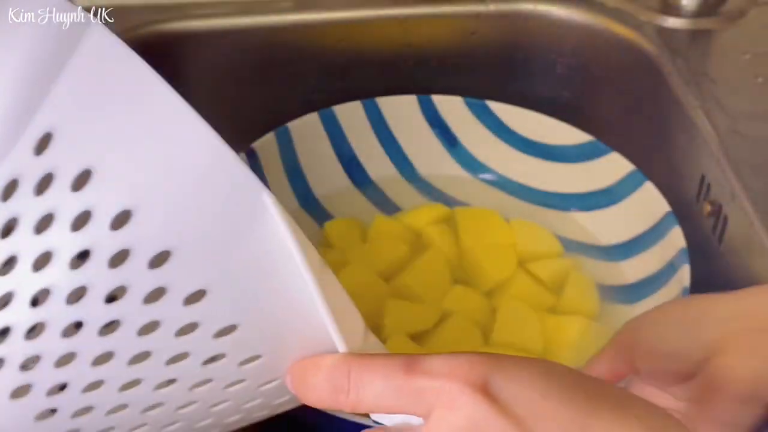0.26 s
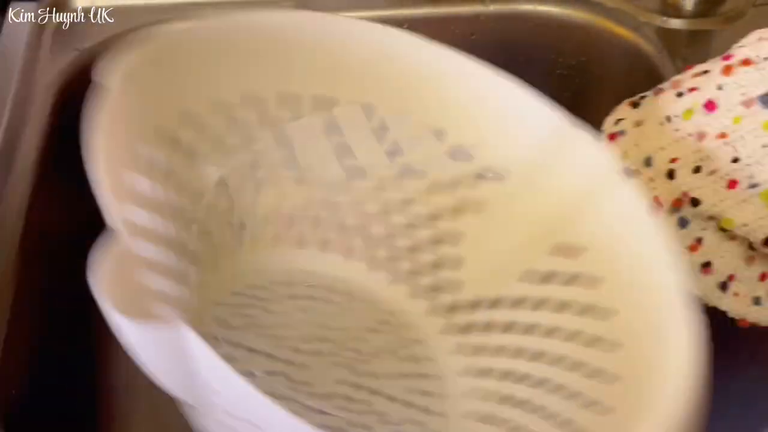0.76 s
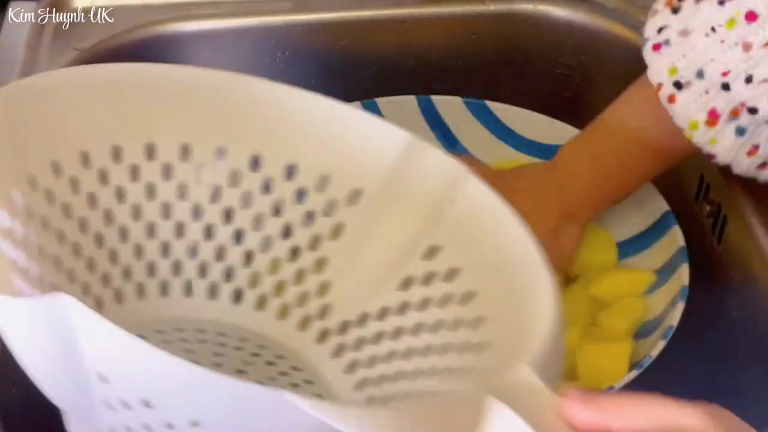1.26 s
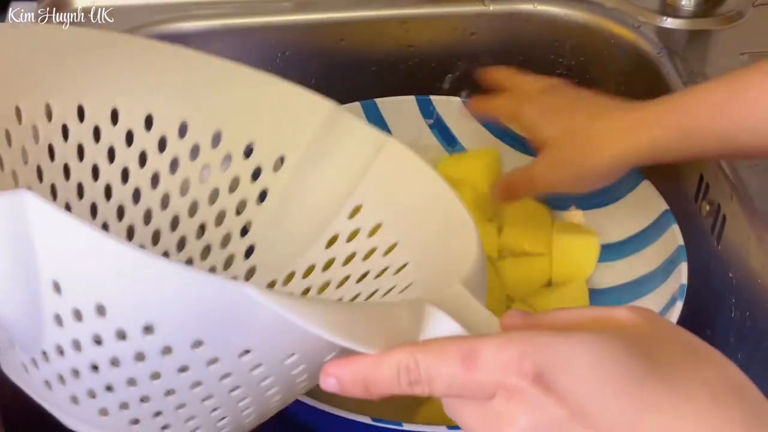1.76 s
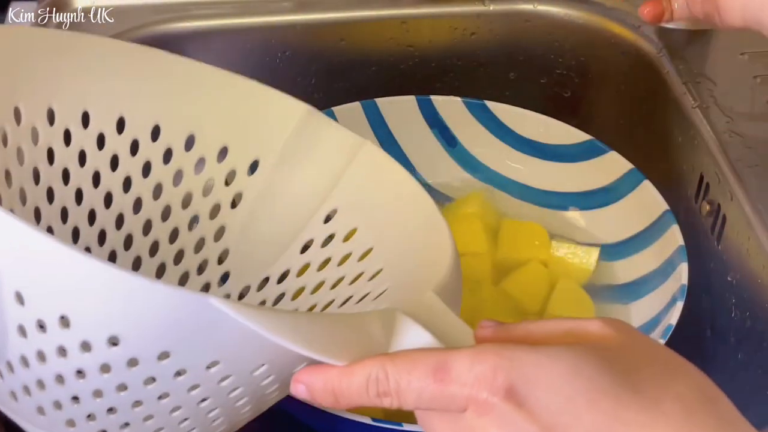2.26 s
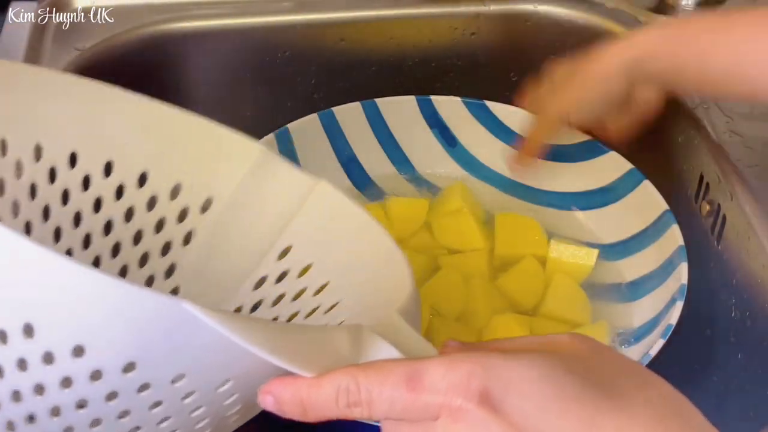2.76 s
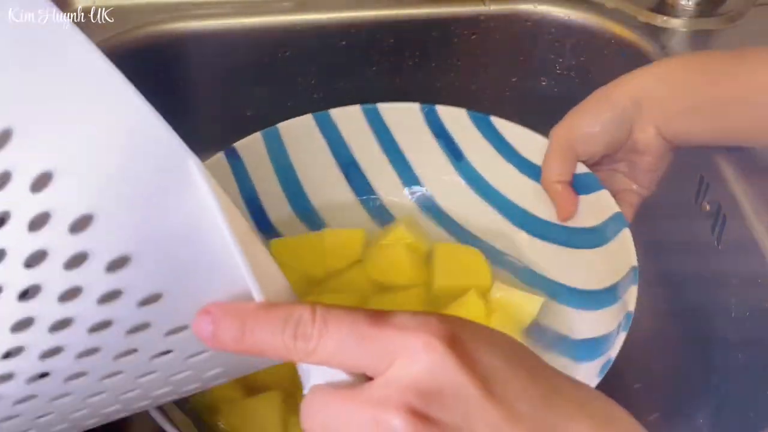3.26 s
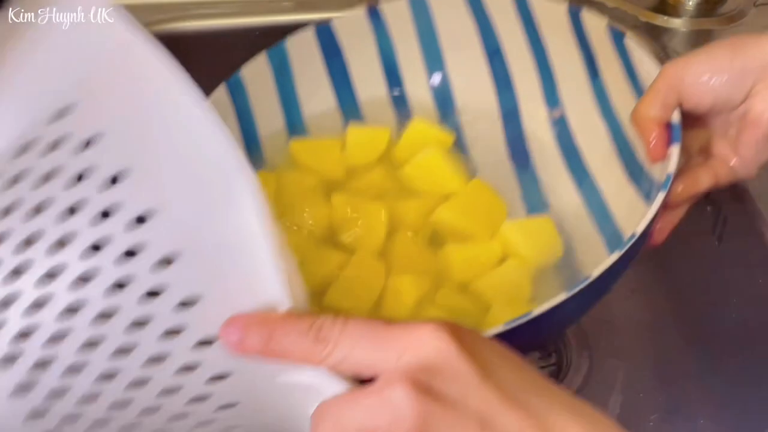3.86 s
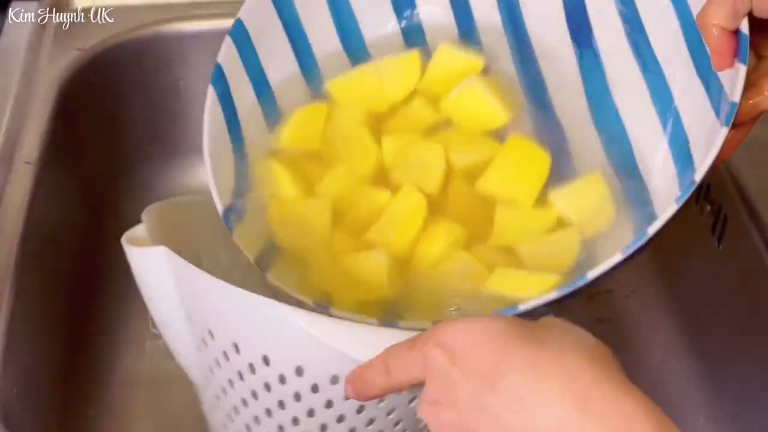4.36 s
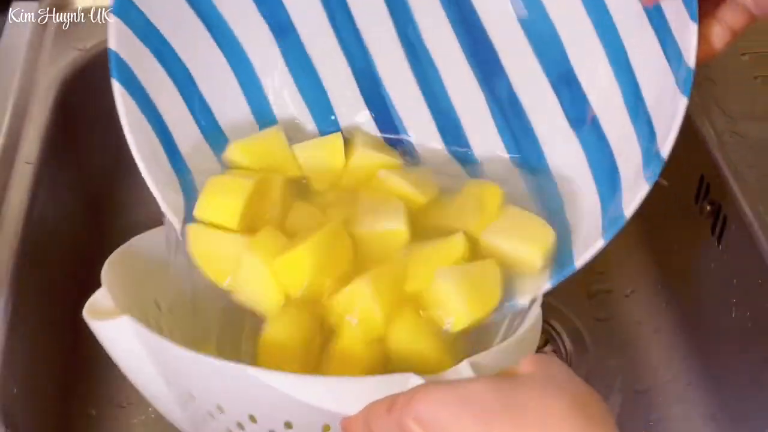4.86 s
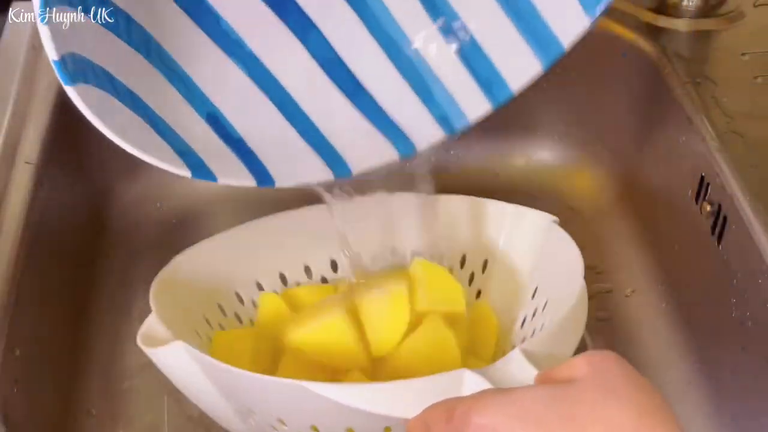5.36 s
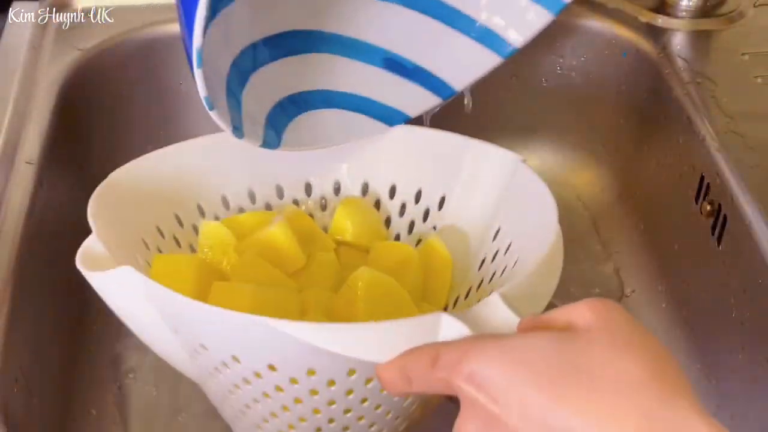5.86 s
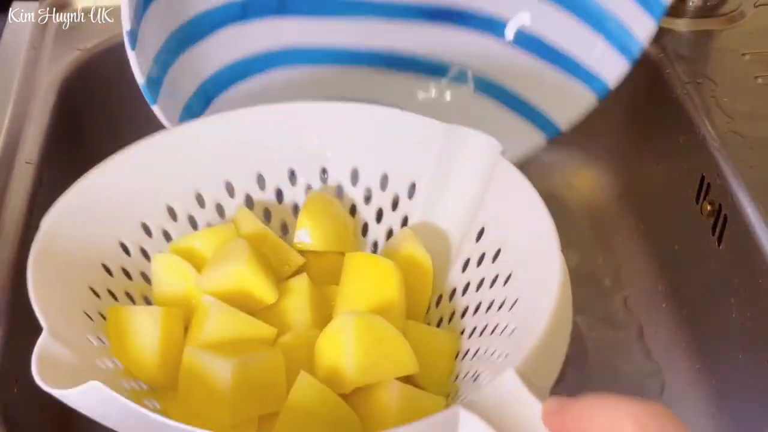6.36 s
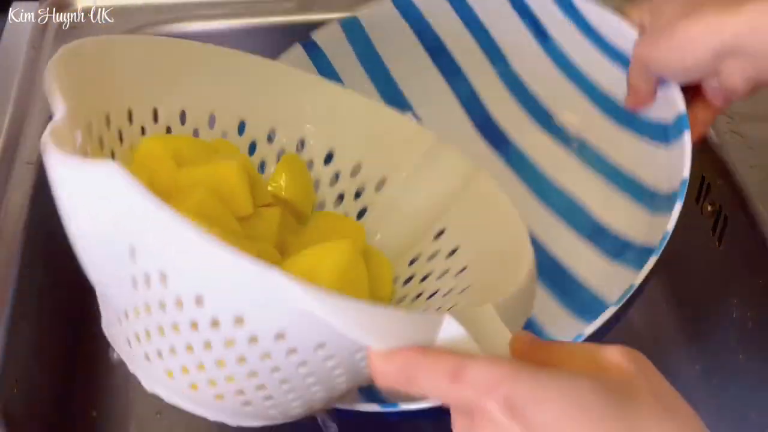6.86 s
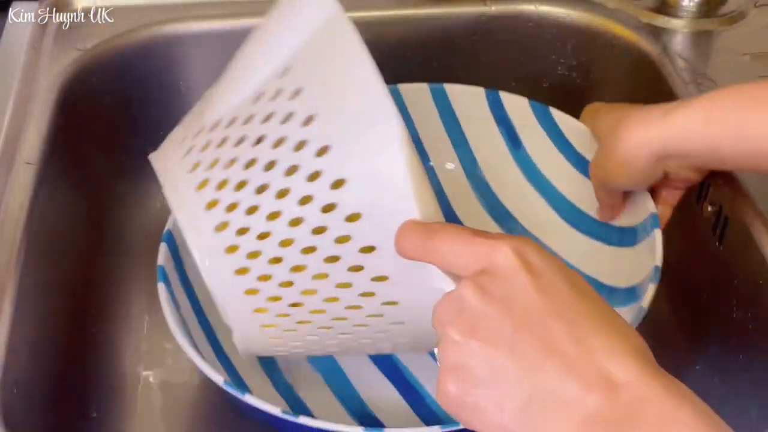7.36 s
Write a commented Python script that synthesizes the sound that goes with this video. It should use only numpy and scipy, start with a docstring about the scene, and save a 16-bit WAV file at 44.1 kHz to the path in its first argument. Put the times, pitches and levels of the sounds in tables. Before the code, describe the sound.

Hands slosh potato pieces in a bowl of water in a steel sink, pour them splashing into a plastic colander, then tumble them back with hollow thuds.

```python
"""Potatoes in a sink

Hands stir potato pieces in a bowl of water in a steel sink, pour them into a plastic colander and tip them back.
Struck basin, bowl and thin metal ring as damped modes; rims click as short noise bursts.
Water is flickering noise, gliding bubbles and spray; hollows gurgle as resonators and the colander drips.
A phone with two microphone ports hears it from close by in a small kitchen, with echo and background noise."""
import sys
import numpy as np
from scipy import signal
from scipy.fft import rfft, irfft, next_fast_len
from scipy.io import wavfile
from scipy.ndimage import uniform_filter1d

SR = 44100
rng = np.random.default_rng(int(sys.argv[2]) if len(sys.argv) > 2 else 0)


def inscribe(sig):
    """Save sig as 16-bit PCM at rate SR to the path in sys.argv[1].

    A 1-D sig is mono; a 2-D sig holds one channel per row.
    Samples are clipped to [-1, 1] before scaling.
    """
    pcm = np.round(np.clip(np.atleast_2d(sig).T, -1, 1) * 32767)
    wavfile.write(sys.argv[1], SR, pcm.astype(np.int16))


N = 335160
T = np.arange(N) / SR

# modes of the steel basin, ten lower and then the upper ones: f/Hz, strike gain/dB, t60/s
BASIN = [(59.3, -22, 0.078), (111, -7.5, 0.068), (145, -5, 0.36), (174.4, -1.5, 0.29), (208.7, 1.5, 0.12),
         (253.7, 1, 0.23), (309.4, -4.5, 0.2), (342.2, 2, 0.22), (385.8, -7.5, 0.13), (474, -4, 0.13),
         (530, -3.5, 0.12), (607, -38, 0.15), (682, -8, 0.12), (735.5, -21.5, 0.21), (927, 1.5, 0.02),
         (1185, -19, 0.043), (1390, -8.5, 0.019), (1880, -17, 0.035)]
# spectral balance of the water, for rush and bubbles: f/Hz, level/dB
WATER = [(300, -15), (800, -11.5), (2000, 0.5), (3500, 2), (6000, -4.5), (8500, -1), (11000, 14.5)]


def undb(db):
    """Decibels to an amplitude ratio, 20 dB per decade."""
    return 10 ** (np.asarray(db) / 20)


def decay(t, t60):
    """Exponential decay: the envelope falls 60 dB in t60 seconds."""
    return undb(-60 * t / t60)


def unit(x):
    """Normalise to an rms of 1."""
    return x / np.sqrt(np.mean(x ** 2))


def curve(table):
    """A (t/s, value/dB) table interpolated linearly over the whole scene."""
    return np.interp(T, *np.transpose(table))


def on_hz(table, hz):
    """A (f/Hz, value) table interpolated on a logarithmic frequency axis."""
    f, v = np.transpose(table)
    return np.interp(np.log(np.maximum(hz, 1)), np.log(f), v)


def shape(x, gain):
    """Linear filtering: multiply the spectrum by a function of frequency."""
    size = next_fast_len(x.shape[-1])
    hz = np.arange(size // 2 + 1) * SR / size
    return irfft(rfft(x, size) * gain(hz), size)[..., :x.shape[-1]]


def band(x, lo_hz, hi_hz):
    """Butterworth band-pass filter."""
    sos = signal.butter(2, [lo_hz, min(hi_hz, .45 * SR)], "bandpass", fs=SR, output="sos")
    return signal.sosfilt(sos, x)


def mode(x, hz, t60):
    """Damped harmonic oscillator: a pole pair driven by x."""
    pole = np.exp(2j * np.pi * hz / SR - np.log(1000) / (max(t60, .002) * SR))
    return signal.lfilter([0, pole.imag], [1, -2 * pole.real, abs(pole) ** 2], x)


def walk(rate):
    """Band-limited random modulation: levels held 1 / rate s, slewed twice, rms near 1."""
    k = int(SR / rate)
    steps = np.repeat(rng.standard_normal(N // k + 1), k)
    return unit(uniform_filter1d(uniform_filter1d(steps, k), k)[:N])


def add(out, s, x, db):
    """Superposition: place a sound at s seconds with its own peak at db."""
    i = int(s * SR)
    out[i:i + len(x)] += (x * undb(db) / np.abs(x).max())[:N - i]


def grains(rate, spread_db):
    """Shot noise: random impulses, of which a few are much larger than the rest."""
    out, count = np.zeros(N), int(rate * N / SR)
    place = rng.integers(0, N, count)
    sign = np.sign(rng.standard_normal(count))
    out[place] = sign * undb(spread_db * np.minimum(rng.exponential(size=count), 4))
    return out


def rattle(length_s):
    """Repeated impact: a blow, then quick random bounces that die out around length_s."""
    t = np.arange(SR // 3) / SR
    bounces = rng.standard_normal(len(t)) * (rng.random(len(t)) < .02)
    push = bounces * np.exp(-(t / max(length_s, .002)) ** 3)
    push[0] = 2.56
    return push


def ring(push, modes, tone_hz=470, lean_db=0, detune=0.038):
    """Modal superposition, leaning to tone_hz; grip and water load shift each mode a little each time."""
    out = 0
    for (hz, db, t60), k in zip(modes, 1 + detune * rng.standard_normal(len(modes))):
        lean = lean_db * np.exp(-(np.log2(hz / tone_hz) / 0.14) ** 2)
        out = out + undb(db + lean) * mode(push, hz * k, t60)
    return out


def bubble(hz, cycles, swell=0.94, glide=0.027):
    """Bubble resonance: it swells, decays over a few cycles and glides up in pitch."""
    n = hz * np.arange(int(5 * cycles / hz * SR)) / SR  # elapsed cycles
    tone = np.sin(2 * np.pi * n * (1 + glide * n / cycles))
    return tone * np.exp(-n / cycles) * np.minimum(n / swell, 1)


def kitchen():
    """Coloured background noise in two independent parts; its treble swells, dips and wavers."""
    # background spectrum: f/Hz, relative spectrum level/dB
    spectrum = [(18, -21), (30, -18), (102, 12), (246, -1.5), (339, -25), (418, -23), (1080, -13.5),
                (2200, -21), (4410, -31.5), (5430, -20.5), (7500, -81), (9750, -18.5), (16500, -120)]
    # slow level of the treble: t/s, gain/dB
    hiss = [(0, 2), (1.9, -2), (2.15, -12), (2.25, 8), (2.55, -9), (2.62, -1), (2.68, 2), (2.8, -15),
            (2.87, 3), (3.55, 3), (3.7, -18), (3.78, 4), (4.18, -3), (4.3, 5), (7.6, 2)]
    hum = shape(rng.standard_normal((2, N)), lambda hz: undb(on_hz(spectrum, hz)))
    hum *= undb(-48.5) / hum[0].std()  # rms before the treble varies
    treble = shape(hum, lambda hz: 1 / (1 + (1900 / (hz + 1)) ** 4))
    treble_gain = undb(curve(hiss) - 3.5 * walk(19))
    return hum + treble * (treble_gain - 1)


def drag():
    """Stick-slip friction: uneven slips drive the basin modes, damped to a third of their decay time."""
    # rms level of dragging and sloshing: t/s, level/dB
    drag_level = [(0, -53), (.29, -30), (.49, -32), (.7, -37.5), (.91, -42), (1.08, -32.5), (1.44, -35.5),
                  (1.95, -48), (2.77, -51.5), (2.97, -41.5), (3.17, -37), (3.27, -47.5), (3.6, -49.5),
                  (4.49, -47), (4.99, -35.5), (5.61, -43), (7.22, -44.5), (7.3, -14.5), (7.43, -41.5),
                  (7.6, -15)]
    slips = grains(500, 0.89) * undb(3.94 * walk(25))
    body = 0
    for hz, db, t60 in BASIN[1:]:
        body = body + undb(db) / (1 + (hz / 600) ** 2) * mode(slips, hz, 0.33 * t60)
    return undb(curve(drag_level)) * unit(body)


def slosh():
    """Random excitation of resonators: water slops against the walls and wakes the middle modes."""
    # rms level of the slops: t/s, level/dB
    slosh_level = [(0, -67), (.35, -41), (.8, -63), (1.0, -48.5), (1.6, -39), (1.9, -62.5), (2.8, -60.5),
                   (2.95, -60), (3.1, -35), (3.22, -53), (3.3, -64), (3.7, -65), (4.45, -63), (4.55, -44.5),
                   (4.9, -60), (5.4, -52.5), (5.8, -67), (7.6, -57)]
    slops = sum(unit(mode(grains(300, 2.7), hz, 0.11)) for hz, _, _ in BASIN[7:14])
    return undb(curve(slosh_level)) * unit(slops * undb(3.8 * walk(16)))


def rumbles():
    """Structure-borne noise: the heavy bowl shifts its weight and deep swells pass through the worktop."""
    # swells: centre t/s, level/dB, half-width/s
    shifts = [(.12, -32, 0.36), (.49, -31, 0.078), (.74, -31, 0.023), (1.45, -37.5, 0.36),
              (2.96, -38, 0.062), (4.02, -48, 0.11), (4.27, -36.5, 0.031), (4.55, -46, 0.028),
              (4.78, -33.5, 0.089), (7.27, -36.5, 0.2), (7.6, -27, 0.094)]
    swells = undb(-55.5)  # level at rest
    for s, db, half_s in shifts:
        swells = swells + undb(db) * np.exp(-((T - s) / half_s) ** 2)
    return swells * unit(band(rng.standard_normal(N), 45.3, 75))


def crowd(flow):
    """Entrained air: many small bubbles of every size; weak flow traps little air."""
    out = np.zeros(N)
    when, pitch, size, length = rng.random((18000, 4)).T
    flow_db = np.interp(when * T[-1], *np.transpose(flow))
    hz = 400 * 2 ** (4.1 * pitch)
    air_db = .5 * np.minimum(flow_db + 39.0, 0)
    size_db = -8.0 - 3.08 * np.log(size + 0.028)  # a few are much louder
    level_db = flow_db + air_db + on_hz(WATER, hz) + size_db
    for k in np.flatnonzero(flow_db > -58):
        add(out, when[k] * T[-1], bubble(hz[k], 3 + 12 * length[k] ** 2, glide=0.015), level_db[k])
    return out


def rush(gust):
    """Turbulence noise: half-octave steps of noise that flicker band by band on a common gust."""
    out = 0
    for hz in 420 * 2 ** np.arange(0, 4.7, .5):
        flicker_db = 3.9 * gust + 2.7 * walk(25)
        noise = unit(band(rng.standard_normal(N), hz / 1.28, hz * 1.07))
        out = out + undb(on_hz(WATER, hz) + flicker_db) * noise
    return unit(out)


def fine_spray(gust):
    """Droplet shot noise over steady hiss, in bursts; single droplets fade out of weak spray."""
    # top end of the fine spray: t/s, level/dB
    spray_level = [(0.0, -66), (0.32, -65), (0.47, -82), (0.7, -66), (0.87, -57), (1.18, -49.5),
                   (1.52, -51.5), (1.82, -64), (2.2, -66.5), (2.35, -67), (2.8, -70), (2.95, -71),
                   (2.99, -56), (3.18, -58), (3.27, -68.5), (3.64, -73.5), (4.49, -62), (4.8, -46),
                   (5.21, -39.5), (5.44, -42), (5.65, -56), (6.96, -67), (7.6, -55)]
    spray_db = curve(spray_level)
    droplets = .5 * undb(np.minimum(spray_db + 48, 0)) * unit(grains(400, 8.0))  # full share from -48 dB up
    noise = band(rng.standard_normal(N) + droplets, 6000, 15800)
    bursts = noise * undb(4.0 * gust + 2.5 * walk(30))
    return undb(spray_db + 3) * unit(bursts)  # the whole band lies 3 dB above its top end


def splash():
    """Flow noise: a crowd of bubbles, a turbulent rush and a fine spray that share their gusts."""
    # strength of the splash: t/s, level/dB
    flow = [(0, -61.5), (.3, -47), (.57, -64), (.76, -48.5), (1.06, -34), (1.27, -40.5), (1.36, -37),
            (1.57, -33.5), (1.92, -63.5), (2.15, -78), (2.3, -60), (2.55, -55.5), (2.72, -67), (2.8, -59),
            (2.9, -55.5), (3.05, -45), (3.2, -46.5), (3.3, -72), (3.47, -56), (3.7, -69), (4.04, -43),
            (4.2, -81), (4.75, -36.5), (4.89, -38.5), (5.04, -30), (5.33, -30.5), (5.61, -42), (6.8, -60.5),
            (6.92, -52), (7.13, -46.5), (7.22, -55), (7.6, -34.5)]
    gust = walk(22.058)
    return crowd(flow) + undb(curve(flow) - 8) * rush(gust) + fine_spray(gust)


def knocks():
    """Impact excitation: each dull knock rattles the basin's modes; harder contact wakes the upper ones."""
    # knocks: t/s, lower modes' peak/dB, favoured tone f/Hz, upper modes minus that peak/dB
    blows = [(0.016, -38, 80.7, -32), (0.103, -14.5, 430, -2.5), (0.111, -4.5, 113, -6),
             (0.33, -13.5, 399, -7.5), (0.408, -17, 407, -11), (0.475, -21, 377, -45),
             (0.736, -30, 372, -3.5), (0.895, -12, 160.5, -12), (0.912, -16, 340, -20),
             (0.961, -18.5, 171, -25), (0.995, -38, 336, 6), (1.129, -18, 298, -9),
             (1.155, -18.5, 330, -20), (1.296, -31.5, 250, 7.5), (1.396, -25.5, 244, -33),
             (1.465, -25, 237, 0.5), (1.585, -22.5, 234, -13), (1.55, -21, 154, -14),
             (2.94, -30.5, 550, -12), (2.967, -29, 177, -36), (3.021, -33, 316, -1.5), (3.051, -35, 555, 1),
             (3.083, -21.5, 321, -5), (3.18, -28.5, 316, -1.5), (3.205, -29.5, 148, -6),
             (3.532, -40.5, 420, 3), (3.762, -39.5, 420, 2.5), (3.834, -19.5, 207, -0.5),
             (3.937, -15, 204, -30), (3.964, -16.5, 174, -34), (3.984, -15, 320, -34),
             (4.01, -16, 202, -44), (4.035, -23.5, 161, -28), (4.212, -23, 279, 0.5),
             (4.396, -35.5, 480, -1), (4.531, -16, 161, -12.5), (4.559, -17, 207, -23),
             (4.606, -15.5, 166, -10), (4.63, -16.5, 198, -22), (4.715, -16, 140, -28),
             (5.8582, -21.5, 472, -9), (5.859, -21.5, 370, -24), (6.294, -30.5, 189, -2.5),
             (6.437, -31, 108, -20), (7.093, -31.5, 80.7, -43), (7.204, -7, 154.7, -12),
             (7.252, -11.5, 152, -4.5), (7.549, -6.5, 450, -0.5)]
    out = np.zeros(N)
    for s, db, tone_hz, upper_db in blows:
        rattle_s = 0.052 * 2 ** (db / 10.5)  # weaker knocks settle sooner: half the time per 10.5 dB
        push = rattle(rattle_s)
        add(out, s, ring(push, BASIN[:10], tone_hz, 19.2), db)
        add(out, s, mode(push, tone_hz, 0.052), db - 7.5)  # the damped thing that strikes
        add(out, s, ring(push, BASIN[10:]), db + upper_db)
        clatter = rng.standard_normal(len(push)) * decay(T[:len(push)], 5 * rattle_s)
        add(out, s, band(clatter, 214, 700), db + upper_db - 1.5)  # loose plastic chatters along
    return out


def clicks():
    """Transient noise: rims and plastic give a dry crack, a noisy tail around one centre and a treble edge."""
    # clicks: t/s, crack peak/dB, centre f/Hz, treble minus peak/dB, tail minus peak/dB
    taps = [(0.104, -30, 1840, -6.5, 13), (0.3309, -27.5, 2350, -5, -11), (0.409, -30.5, 1600, -9, -14),
            (0.485, -32.5, 1640, -16, -25), (0.713, -49.5, 1800, 0.5, 13), (0.8667, -30.5, 2090, -25, 0.5),
            (2.914, -42, 4200, -15, -25), (3.0834, -52, 2450, -13, -3), (3.179, -37, 1920, -5, -29),
            (3.455, -40.5, 2410, -9, -16), (3.8321, -21, 1650, -12.5, -13.5), (4.2111, -9, 2850, -7.5, -15),
            (4.3936, -27.5, 2960, -19, -28.5), (4.4832, -29.5, 2770, -17, 1.5),
            (4.4923, -19.5, 2570, -10.5, -34), (4.5356, -24, 2470, -4, -29), (4.607, -34, 2630, 2.5, -11),
            (4.6502, -38.5, 2600, 7, 7), (4.704, -22, 1420, 6, -33), (4.711, -18.5, 1320, 8.5, -17),
            (5.859, -13.5, 2670, -12, -20.5), (5.9552, -38, 4130, 6, 4.5), (6.295, -28, 2180, -12, -15),
            (6.438, -36, 2530, -20, -17), (6.69, -43.5, 4530, 13, -31), (7.2019, -8.5, 1420, -10, -17.5),
            (7.2532, -13.5, 1480, -12.5, -30), (7.2901, -19, 1470, -11.5, -30),
            (7.4703, -15.5, 1554, -13, -12), (7.5088, -28, 1440, -19, -7), (7.527, -8.5, 2540, -27, -16),
            (7.536, -19, 3200, -2, -20), (7.5667, -9.5, 1980, -14, -12), (7.5738, -18.5, 3000, -10, -13),
            (7.5877, -18, 1920, -1.5, -13)]
    out, t = np.zeros(N), np.arange(SR // 3) / SR
    crack = np.minimum(t / 0.00079, 1) * decay(t, 0.035)
    tail = decay(t, 0.42)
    for s, db, hz, treble_db, tail_db in taps:
        noise = rng.standard_normal((3, len(t)))
        narrow = band(noise[1] * tail, hz / 1.15, hz * 1.226)
        wide = band(noise[1] * tail, hz / 2.7, hz * 1.45)
        edge = noise[2] * (crack + undb(tail_db) * tail)
        add(out, s, band(noise[0] * crack, hz / 2.54, hz * 1.72), db)
        add(out, s, narrow + 0.19 * wide, db + tail_db)
        add(out, s, band(edge, 6030, 11460), db + treble_db)
    return out


def trickle():
    """Cavity resonance: drops and slops excite a hollow of bowl, colander or drain; its pitch wanders a little."""
    # gurgles: start t/s, end t/s, f/Hz, level before the swell/dB
    gurgles = [(0.41, 0.825, 379, -42), (0.887, 1.094, 718, -41.5), (1.133, 1.33, 720, -43),
               (1.148, 1.751, 238.4, -31), (4.97, 5.195, 888, -35), (5.206, 5.337, 1177, -38),
               (6.39, 6.53, 1360, -50.5), (6.2, 6.287, 2760, -58), (6.496, 6.637, 2050, -50.5),
               (6.724, 7.184, 842, -50.5), (6.856, 7.213, 1380, -50), (6.96, 7.147, 1580, -48.5),
               (7.022, 7.143, 1960, -53)]
    out, cycles = np.zeros(N), 55  # cycles per 60 dB of decay
    for start, end, hz, db in gurgles:
        span = slice(int(start * SR), int(end * SR))
        swell = np.hanning(len(out[span])) ** 0.32
        hollow = sum(mode(grains(90, 2.1)[span], hz * k, cycles / hz) for k in (.98, 1.02))
        out[span] += undb(db) * swell * unit(hollow)
    return out


def spray_tick():
    """Short noise burst: the treble tick of bursting water."""
    t = np.arange(SR // 20) / SR
    return band(rng.standard_normal(len(t)) * decay(t, 0.014), 5000, 12800)


def plips():
    """Bubble resonance: single loud bubbles, each with a soft slap of water and a tick of spray."""
    # bubbles that pop in the splash: t/s, bubble peak/dB, f/Hz
    pops = [(0.846, -30.5, 2750), (0.95, -23, 2530), (1.007, -21, 2000), (1.021, -17, 2600),
            (1.04, -23, 2500), (0.96, -25.5, 1500), (1.42, -28, 2500), (1.029, -18.5, 1860),
            (1.037, -20, 1960), (1.161, -23.5, 1460), (1.188, -23, 2560), (1.217, -16, 2090),
            (1.245, -20.5, 2920), (1.319, -12, 1960), (1.348, -16.5, 2060), (1.376, -17, 2330),
            (1.393, -22.5, 3000), (1.44, -20.5, 3180), (1.464, -26, 3400), (1.485, -19, 3300),
            (1.553, -22, 2120), (1.557, -33, 4960), (1.568, -21.5, 4000), (1.563, -26, 2080),
            (1.597, -23, 2140), (1.649, -30, 1400), (1.815, -43, 4440), (1.835, -50, 2800),
            (1.897, -43.5, 3900), (4.818, -31, 960), (4.822, -40, 1240), (4.853, -28.5, 925),
            (4.971, -32, 3140), (4.987, -20.5, 855), (5.01, -26, 895), (5.053, -13, 3200),
            (5.126, -25, 2310), (5.195, -31, 2930), (5.207, -17, 1216), (5.267, -24, 1210),
            (5.269, -24, 2700), (5.015, -21, 2880), (5.314, -26, 1160), (5.354, -23, 1690),
            (5.414, -23, 2330), (5.456, -23.5, 2000), (5.463, -22, 2150), (5.355, -24, 3500),
            (4.905, -31, 2600), (5.36, -24, 5470), (5.528, -24.5, 2410), (5.687, -34, 4300)]
    # drops that burst on hard rims, tick alone: t/s, peak/dB
    bursts = [(0.83, -37), (1.02, -19), (1.036, -21), (1.555, -16.5), (1.596, -21), (4.972, -24),
              (5.01, -26), (5.064, -12.5), (5.354, -11.5), (5.415, -32)]
    out, t = np.zeros(N), np.arange(SR // 20) / SR
    slap = np.minimum(t / 0.0019, 1) * decay(t, 0.052)
    for s, db, hz in pops:
        add(out, s, bubble(hz, 4.2, swell=1.1), db)
        add(out, s, band(rng.standard_normal(len(t)) * slap, hz / 2.28, hz * 1.28), db - 3.5)
        add(out, s, spray_tick(), db - 14)
    for s, db in bursts:
        add(out, s, spray_tick(), db)
    return out


def clinks():
    """Plate modes: a hard thing taps thin metal, giving a short tick and a thin ring."""
    # taps: t/s, tick peak/dB, ring minus tick peak/dB
    taps = [(2.2387, -30, -2), (2.2794, -40, -4), (2.377, -48, -8), (2.4833, -33, -9), (2.508, -48, 2),
            (2.8457, -48, -6)]
    # modes of the thin metal: f/Hz, strike gain/dB, t60/s
    metal = [(2390, -9, .06), (2790, -6, .15), (2848, 0, .27), (2905, -4, .2), (3480, -6, .06),
             (4129, -9, .11), (5055, -9, .19), (5120, -13, .15), (5480, -8, .06), (6148, -12, .12),
             (6207, -10, .13)]
    out, t = np.zeros(N), np.arange(SR // 20) / SR
    for s, db, ring_db in taps:
        tick = rng.standard_normal((2, len(t))) * decay(t, 0.04)
        add(out, s, band(tick[0], 1740, 4400), db)
        add(out, s, band(tick[1], 7400, 10050), db + 1)
        add(out, s, ring(rattle(0.0013), metal, detune=0.003), db + ring_db)
    return out


def drips():
    """Random impacts: the colander drains, drops wake modes of the steel and some trap a bubble in a puddle."""
    # wet basin under the drips: f/Hz, relative rms level/dB, t60/s
    drip_modes = [(854, -0.5, 0.15), (1330, 2.5, 0.092), (1960, -9, 0.046), (2710, -0.5, 0.026),
                  (3570, -8.5, 0.062), (4100, -8.5, 0.057)]
    start_s, end_s, drops_per_s = 5.65, 7.2, 60
    # each spot wakes another mode, so every mode has its own drops
    steel = sum(undb(db) * unit(mode(grains(drops_per_s, 5.8), hz, t60)) for hz, db, t60 in drip_modes)
    gate = uniform_filter1d(1. * (T > start_s) * (T < end_s), SR // 10)
    out = undb(-55) * unit(steel) * gate
    for when, pitch, size, length in rng.random((120, 4)):
        drop = bubble(800 * 2 ** (2.4 * pitch), 14 + 22 * length, glide=0.008)
        add(out, start_s + when * (end_s - start_s), drop, -53.5 - 2.5 * np.log(size + 0.06))
    return out


def landings():
    """Soft impact on a resonator: potato pieces ring the empty bowl, and the next to land stops each ring."""
    # landings: t/s, peak/dB, favoured tone f/Hz
    pieces = [(7.444, -7.5, 484), (7.469, -2.5, 474), (7.495, -9.5, 475), (7.512, 0.5, 420),
              (7.527, -4, 560), (7.565, -1.5, 613), (7.583, -3, 590)]
    # modes of the bowl: f/Hz, strike gain/dB, t60/s
    bowl_modes = [(321, -34, 0.27), (475.5, 6, 0.99), (513, -16, 0.26), (590, -1, 0.16), (626, 0, 0.11),
                  (964, -1.5, 0.14), (1350, -34, 0.091), (1550, -10, 0.06), (2010, -24, 0.042)]
    out = np.zeros(N)
    soft = int(0.0004 * SR)  # a potato pushes the bowl for 0.4 ms
    stops = [row[0] for row in pieces[1:]] + [T[-1]]
    for (s, db, tone_hz), next_s in zip(pieces, stops):
        push = uniform_filter1d(np.roll(rattle(.002), soft), soft)
        bowl = ring(push, bowl_modes, tone_hz, 12, detune=.003)
        late_s = np.maximum(s + T[:len(bowl)] - next_s, 0)
        add(out, s, band(bowl, 370, 6000) * undb(-2500 * late_s), db)  # stopped at 2500 dB/s
    return out


def room(x):
    """Reverberation by convolution: three echoes of basin and walls take turns as the hands move.

    Returns the sound with its echo, and an unrelated echo that differs between the ports."""
    # reverberation time: f/Hz, t60/s
    echo_t60 = [(60, 0.27), (500, 0.44), (3000, 0.46), (16000, 0.27)]
    t, out = np.arange(SR // 3) / SR, 0
    for place in range(3):
        echo = 0
        for hz in 60 * 2. ** np.arange(9):
            octave = band(rng.standard_normal((2, len(t))), hz / 2 ** .5, hz * 2 ** .5)
            echo = echo + octave * decay(t, on_hz(echo_t60, hz))
        echo *= np.minimum(t / 0.00034, 1) / np.sqrt(np.sum(echo[0] ** 2))
        share = np.cos(np.pi * (T / 1.126 + place / 3)) ** 2 / 2.5
        out = out + signal.fftconvolve((x * share)[None], echo, axes=1)[:, :N]
    return x + undb(-0.5) * out[0], out[1]


def bowl_apart(bowl):
    """Interaural-style cues: the bowl's main mode is louder on the left, the next ones lead there in phase."""
    left_db, lead = 10, .6  # level ratio left to right; quadrature share

    def near(hz, centre_hz):
        return np.exp(-(np.log2((hz + 1) / centre_hz) / 0.27) ** 2)

    half_difference = np.tanh(np.log(undb(left_db)) / 2)
    return shape(bowl, lambda hz: half_difference * near(hz, 480) + lead * 1j * near(hz, 700))


def scene():
    """Superposition of all sources: a sum common to both ports, and a part of opposite sign at each."""
    # sound unlike at the two ports: f/Hz, gain/dB
    unlike = [(30, -11), (130, -13), (330, -6.5), (640, 3), (1410, -6), (2300, -51), (3100, -9),
              (5000, -8.5), (6800, 7), (9000, -16.5), (12000, -13)]
    hum = kitchen()
    water = splash() + trickle() + plips() + drips()
    solids = drag() + slosh() + rumbles() + knocks() + clicks() + clinks()
    bowl = landings()
    bowl_send = undb(-9)  # the near bowl stirs less echo
    both, apart = room(solids + water + bowl_send * bowl)
    apart = shape(apart + hum[1], lambda hz: undb(on_hz(unlike, hz))) + bowl_apart(bowl)
    return both + (1 - bowl_send) * bowl + hum[0] + apart * np.array([[1], [-1]])


def record(dry):
    """Transducer response: the body shifts phase between ports, capsules lose deep bass and top, peaks clip."""
    # capsule response: f/Hz, gain/dB
    capsule = [(25, -32), (45, -4), (13500, 1), (16000, -3.5)]
    # phase by which the left port leads: f/Hz, phase/rad
    port_lead = [(30, 0), (860, .3), (1640, 0), (5250, .1), (6800, -.8), (7670, -2.4), (8350, -3.0),
                 (9560, -3.3), (11600, -5.2), (12400, -6.2), (16000, -6.3)]
    side = np.array([[1], [-1]])
    ports = shape(dry, lambda hz: undb(on_hz(capsule, hz)) * np.exp(.5j * on_hz(port_lead, hz) * side))
    low_pass = signal.ellip(8, .2, 70, 16000, fs=SR, output="sos")  # nothing much above 16 kHz
    return signal.sosfilt(low_pass, np.clip(ports, -1, 1))


dry = scene()
out = record(dry)
inscribe(out)
```